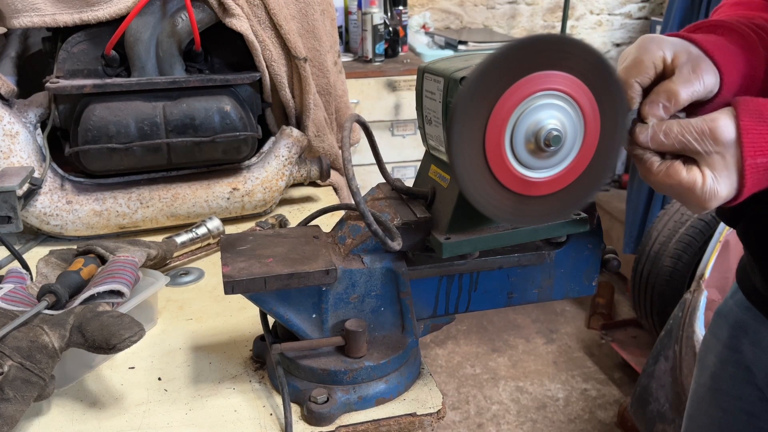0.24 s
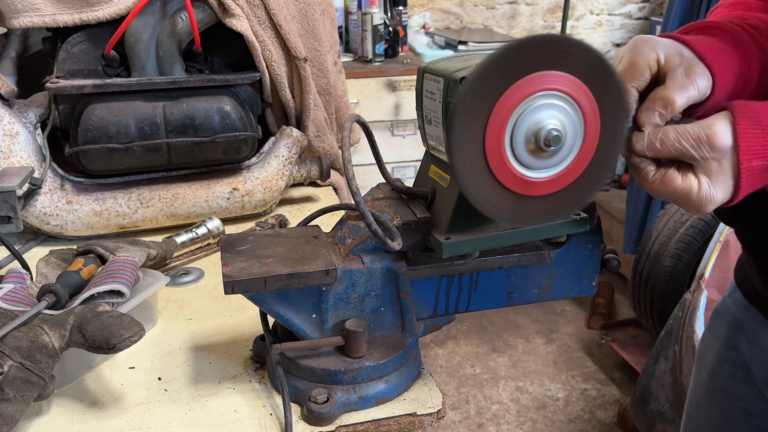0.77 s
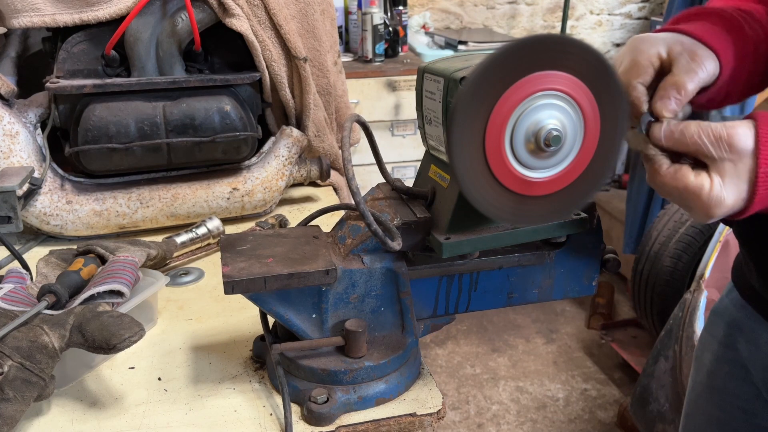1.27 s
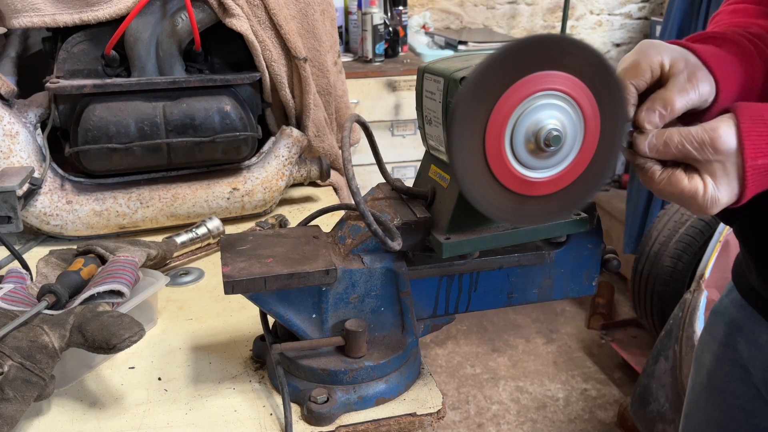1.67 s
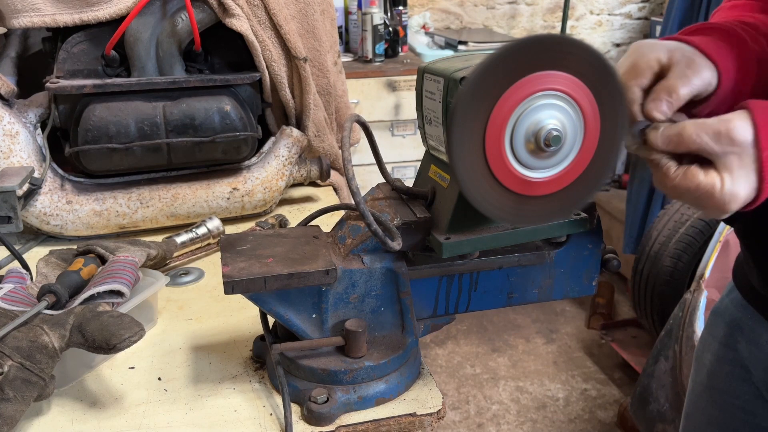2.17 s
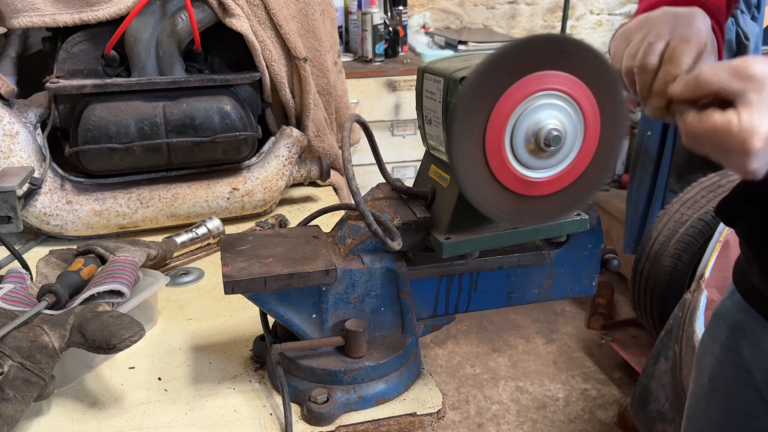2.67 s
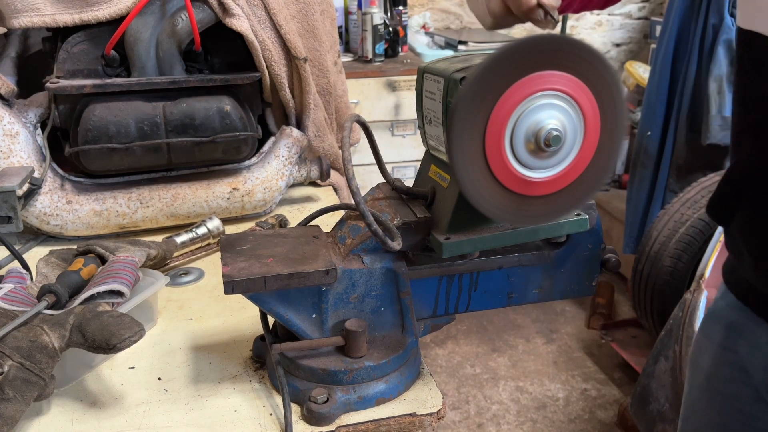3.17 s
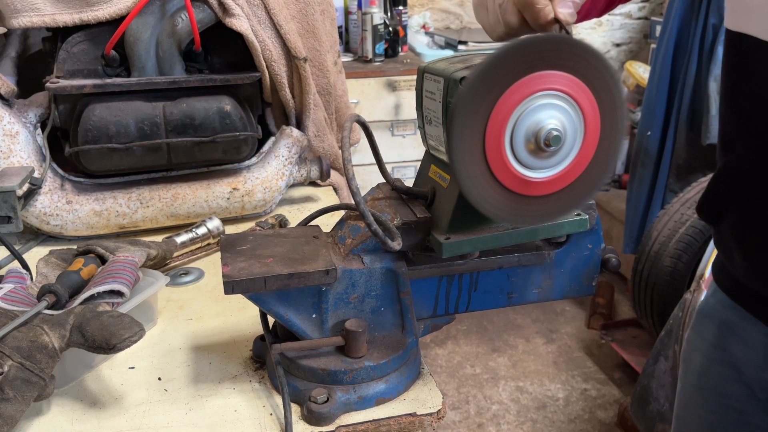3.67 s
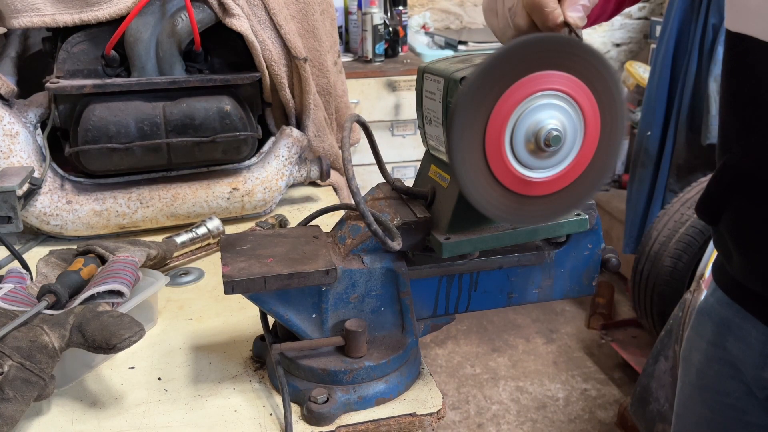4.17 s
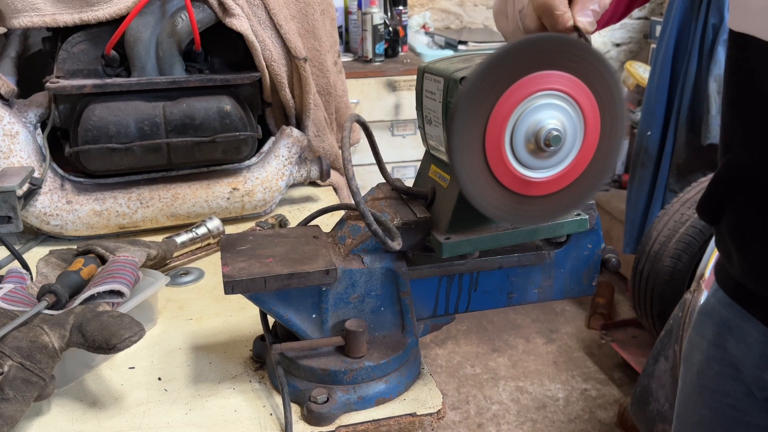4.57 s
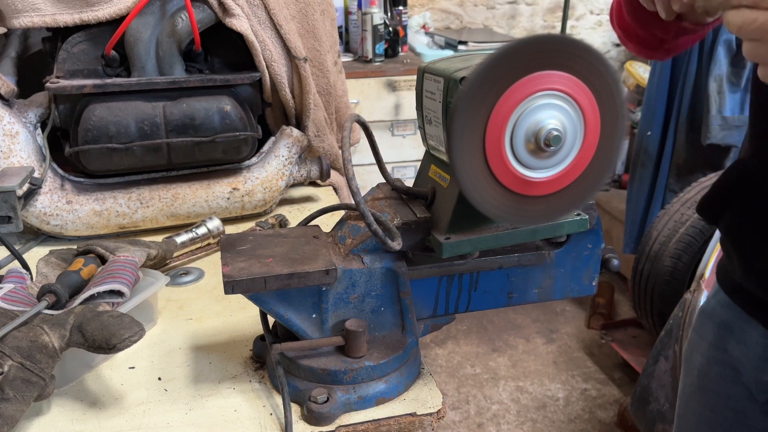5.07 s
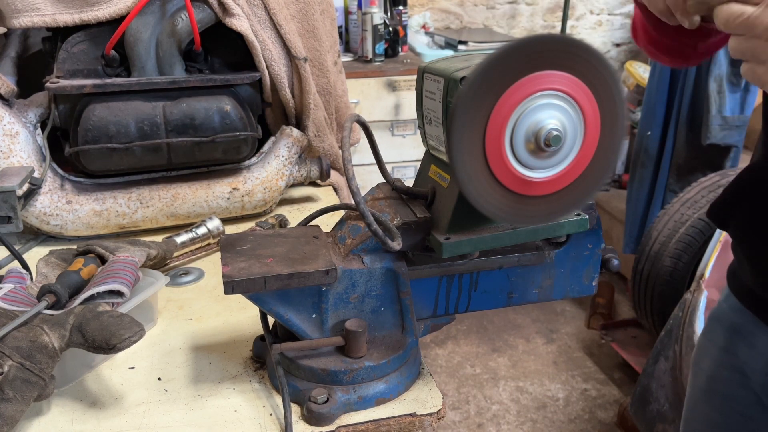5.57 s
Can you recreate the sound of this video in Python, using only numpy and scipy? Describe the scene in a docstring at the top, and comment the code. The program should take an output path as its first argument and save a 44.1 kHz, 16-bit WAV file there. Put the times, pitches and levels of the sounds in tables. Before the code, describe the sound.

Close workshop grinder running throughout, with bursts of harsh metallic scraping on the spinning wheel, pauses of plain motor drone, and a final thinner grind.

```python
"""In a workshop a bench grinder runs at about 49 turns a second. A small steel part is pressed on the front of
its wheel in two goes of two presses each, then once, more lightly, on its top. Rim noise that partly repeats
each turn makes the scrape, and drives resonances that ring like the part. Sine tones tied to the turning make
the bench hum, the motor whine and the bearing tones, which sag under load. Shaped noise makes the air hiss."""
import sys
import numpy as np
from scipy import signal
from scipy.fft import rfft, irfft, next_fast_len
from scipy.io import wavfile
from scipy.ndimage import uniform_filter1d, map_coordinates

SR = 44100
rng = np.random.default_rng(int(sys.argv[2]) if len(sys.argv) > 2 else 0)


def wav_out(sig):
    """Save sig, one row per channel (or a flat mono array), as 16-bit PCM at SR to the path in sys.argv[1]."""
    wavfile.write(sys.argv[1], SR, np.round(np.clip(np.atleast_2d(sig).T, -1, 1) * 32767).astype(np.int16))


N = 257103

# Colour of the scrape on the wheel's front and on its top. Each row: frequency in Hz, relative level in dB per Hz.
FRONT_SCRAPE = [(300, -7.5), (1200, -7.5), (1650, -10), (2700, -10), (3500, -3.5), (4200, 0.3), (4800, -4),
                (5200, -4), (5600, -3), (6200, -4), (8000, -5.5), (11000, -6), (15200, -8.5)]
TOP_SCRAPE = [(300, -16), (1200, -20), (1550, -14), (2600, -14), (3500, -8.5), (4300, -4.5), (5200, -2.5),
              (5600, -3), (6200, -5), (8000, -1.5), (11000, -5.5), (15200, -11)]
# How the main ring's pitch, its level and the knocks' level rise and fall over time.
# Each row: time in seconds, ring frequency in Hz, change of ring level in dB, change of knock level in dB.
RING_CHANGES = [(0.29, 2040, 3, 2.5), (0.45, 2040, 0.5, 2), (0.54, 2050, -2, 4), (0.75, 2030, -0.5, -0.5),
                (0.8, 2020, 3, 4.5), (0.9, 2010, -1, 0), (1.0, 2070, 3, 1), (1.57, 2045, -1, 3),
                (1.64, 2045, 1, -1), (1.73, 2070, 0.5, 2.5), (1.87, 2070, 1, 2.5), (1.97, 2000, 1, 0),
                (2.07, 2090, -2, 0), (3.29, 2070, -2, -6), (3.39, 2030, 0, -1), (3.55, 2080, 1.5, -1.5),
                (3.82, 2130, 4, 1.5), (3.94, 2040, 1, 0.5), (4.05, 2100, 3, -2), (4.35, 2055, 3.5, -3),
                (4.7, 2060, 2, -1)]
# The part's higher ringing notes. Each row: frequency in Hz, width in Hz, level on the front in dB, on the top in dB.
PART_MODES = [(2395, 210, -7.5, -13.5), (3610, 260, -16, -24), (3895, 310, -10, -19), (4194, 130, -11, -15),
              (4430, 160, -8.5, -12), (4630, 190, -19, -10.5), (4900, 110, -17, -21), (5160, 240, -12, -9),
              (5680, 220, -22, -14), (6180, 290, -11, -11)]
# Colour of the bench shaken by the cut. Each row: frequency in Hz, relative level in dB per Hz.
TREMOR = [(100, 1), (230, 2.5), (310, -4), (400, 4.5), (560, -6), (680, -11), (820, 3), (1000, -3),
          (1500, -31), (2500, -45)]
SPOT_BITE_DB = 1.5  # dB of harder cutting per unit of rim height


def grind(turns, force, spectrum, spot_db, mode_db, width_hz, ring_db, knock_db, scrape_db, bump_db, chop_db, shake_db):
    """Grit tears at the steel: a broad scrape, the part's damped ring and a tremor in the bench."""
    # the wheel bites harder once a turn and at each high spot
    once_a_turn_db = bump_db * np.cos(2 * np.pi * turns)
    spots_db = SPOT_BITE_DB * rim_height(turns, spot_db)
    # the hand-held part chatters and single grains crackle
    bite = unit(amp(once_a_turn_db + spots_db + 0.74 * wobble(140)))
    crackle = amp(1.4 * wobble(2500))

    moving_grit = shifting(rim_noise(turns, repeat=0.23), depth_db=2.5)
    scrape = coloured(bite * crackle * moving_grit, spectrum)

    # fine grit keeps a tight ring going; the high spots add short knocks that the fingers damp
    grit = bite * rim_noise(turns, repeat=0.76)
    ring_hz, ring_change_db, knock_change_db = curves(RING_CHANGES)
    knocks = resonant(strikes(turns, spot_db), 1.022 * ring_hz, 1.5 * width_hz)
    # the part rides up and down on the uneven rim, which chops the ring
    ride = rim_height(turns, spot_db) + 0.5 * np.cos(2 * np.pi * turns)
    chop = amp(chop_db * ride + 1.8 * wobble(110))
    steady_ring = resonant(chop * grit, ring_hz, width_hz)
    ring = amp(ring_db + ring_change_db) * steady_ring + amp(knock_db + knock_change_db) * knocks

    upper = 0
    for (hz, width, *_), db in zip(PART_MODES, mode_db):
        upper = upper + amp(db) * resonant(bite * crackle * grit, hz, width)

    tremor = amp(shake_db) * coloured(bite * rim_noise(turns, repeat=0.41), TREMOR)
    return spread(force * (amp(scrape_db) * scrape + upper + ring + tremor))


# Presses on the wheel's front and on its top. Each row: touch in seconds, lift in seconds,
# force in dB compared with a firm press, lean of the hand in dB per second.
FRONT_PRESSES = [(0.236, 0.478, -2.5, -2), (0.485, 0.983, -0.35, 1.5), (1.538, 1.672, -3.0, 16),
                 (1.71, 2.055, 0.47, -4)]
TOP_PRESSES = [(3.262, 4.703, -1.8, 0.03)]
# How the hand bears down during the top press. Each row: time in seconds, change of force in dB.
TOP_HAND = [(3.4, 1), (3.47, -4), (3.6, -2.5), (3.68, -3.5), (3.9, 0.3), (4.0, -1), (4.3, -2), (4.5, -2),
            (4.62, -0.2)]
ATTACK_S, RELEASE_S = 0.05505, 0.06025  # seconds for the part to settle on the wheel and to leave it


def pressing(presses, hand_db=0):
    """Force on the wheel: each press rises, holds while the hand leans in or eases off, and lets go."""
    t = np.arange(N) / SR
    force = np.zeros(N)
    for touch, lift, force_db, lean in presses:
        settle = np.clip((t - touch) / ATTACK_S, 0, 1)
        leave = np.clip(1 - (t - lift) / RELEASE_S, 0, 1)
        lean_db = lean * (np.clip(t, touch, lift) - (touch + lift) / 2)
        force += settle * leave * amp(force_db + hand_db + lean_db)
    return force


# High spots on the rim that strike the part.
# Each row: place in turns, level on the front in dB, level on the top in dB.
HIGH_SPOTS = [(0, 0.5, 0.5), (0.322, -2.5, -6.5), (0.655, -2.5, -6)]
SPOT_WIDTH_TURNS = 0.06  # how much of the rim a high spot takes up


def rim_height(turns, spot_db):
    """Height of the rim under the part: each high spot is a short, rounded hump."""
    away = (turns - np.array(HIGH_SPOTS)[:, :1] + 0.5) % 1 - 0.5
    humps = np.exp(-0.5 * (away / SPOT_WIDTH_TURNS) ** 2)
    return amp(spot_db) @ humps


def strikes(turns, spot_db, scatter_db=1.5, jitter_turns=0.0021, count=300):
    """Every high spot knocks the part once a turn, never twice quite alike."""
    place = np.arange(count)[:, None] + np.array(HIGH_SPOTS)[:, 0]
    place = place + jitter_turns * rng.standard_normal(place.shape)
    # strikes outside the scene land in one spare sample, which is cut off
    sample = np.interp(place, turns, np.arange(N), left=N, right=N).astype(int)
    sizes = amp(spot_db + scatter_db * rng.standard_normal((2, *place.shape)))
    return np.array([np.bincount(sample.ravel(), s.ravel(), N + 1)[:N] for s in sizes])


def rim_noise(turns, repeat, size=1024):
    """Two noises of which a share comes back with every turn, as the same grit passes again."""
    rims = irfft(np.exp(2j * np.pi * rng.random((2, 2, size // 3))), 8 * size)
    place = np.arange(8 * size) / (8 * size)
    inner, outer = [unit(np.array([np.interp(turns, place, r, period=1) for r in rim])) for rim in rims]
    # the track on the rim changes slowly, so each turn is only nearly like the last
    slide = 0.74 * wobble(2.99)
    again = np.cos(slide) * inner + np.sin(slide) * outer
    share = np.clip(repeat, 0, 1)
    return np.sqrt(share) * again + np.sqrt(1 - share) * rng.standard_normal((2, N))


def shifting(x, depth_db, size=1024):
    """Narrow bands of x swell and fade, as the spot in contact keeps moving."""
    bands = signal.stft(x, nperseg=size)[2]
    field = rng.standard_normal(bands.shape[1:])
    field = uniform_filter1d(field, 3, axis=0)  # neighbouring bands move together
    field = uniform_filter1d(field, 10, axis=1)  # and change gradually
    return unit(signal.istft(bands * amp(depth_db * unit(field)), nperseg=size)[1][:, :N])


IDLE_TURNS_PER_S = 48.91
# speed lost under a firm, held press on the front and on the top; how slowly the wheel follows, in seconds
FRONT_SAG_TURNS_PER_S, TOP_SAG_TURNS_PER_S, INERTIA_S = 0.47, 0.29, 0.05


def shaft_speed(front_force, top_force):
    """Turns a second: the load brakes the motor, and the wheel's inertia smooths the sag."""
    sag = FRONT_SAG_TURNS_PER_S * front_force ** 2 + TOP_SAG_TURNS_PER_S * top_force ** 2
    keep = np.exp(-1 / (INERTIA_S * SR))
    return IDLE_TURNS_PER_S - signal.lfilter([1 - keep], [1, -keep], sag)


# Shaking locked to the shaft. Each row: multiple of the turning rate, level in dB within the hum.
SHAFT = [(1, -1), (2, -0.5), (3, -13.5), (4, -26.5), (5, -28.5), (6, -17.5), (7, -19), (8, -32), (9, -25.5),
         (10, -27.5), (11, -27), (12, -32.5), (13, -35), (14, -29.5), (15, -31.5)]


def hum(turns):
    """The unbalanced wheel rocks the bench, whose feet stiffen at the deepest swing; the housing buzzes higher up."""
    # the three lowest multiples keep a fixed timing to one another
    once, twice, thrice = [np.sqrt(2) * amp(db) * np.cos(2 * np.pi * k * turns) for k, db in SHAFT[:3]]
    rocking = thrice - once - twice
    buzz = sum(amp(db) * tone(k * turns, flutter_db=0.29 * k, drift=0.032 * k) for k, db in SHAFT[3:])
    return amp(-31.0 + 0.43 * wobble(13)) * rocking + amp(-31.5) * buzz


# Multiples that a firm press on the front stirs up in the housing.
# Each row: multiple of the turning rate, level in dB.
LOADED = [(5, -53), (8, -55), (9, -51.5), (13, -61), (15, -55), (17, -45), (19, -63), (23, -70)]


def strain(turns, force):
    """The cut loads the shaft unevenly, so some of its multiples swell with the force."""
    return force * sum(amp(db) * tone(k * turns, flutter_db=0.5, drift=0.2) for k, db in LOADED)


# Swells and dips of the whine. Each row: time in seconds, level in dB before a small overall cut.
WHINE_LEVEL = [(0.3, -40), (0.41, -42), (0.6, -34), (0.85, -44), (0.99, -36), (1.08, -40.5), (1.5, -38.5),
               (1.76, -43), (1.91, -36), (2.12, -39), (3.3, -40), (3.47, -37.5), (3.75, -43.5),
               (3.9, -37.5), (4.0, -39.5)]
WHINE_ORDER, MAINS_HZ = 18, 50  # whine cycles per turn; mains frequency
SLIP_BEAT_DB = 1.5  # two of the side tones throb this far up and down as the rotor slips behind the mains


def whine(turns, level_db):
    """The rotor slots sing; the magnetic pull at twice the mains rate and the wheel's wobble add side tones."""
    slots = WHINE_ORDER * turns
    pull = 2 * MAINS_HZ * np.arange(N) / SR
    throb_db = SLIP_BEAT_DB * np.cos(2 * np.pi * 2 * (pull - 2 * turns))
    singing = amp(level_db - 0.5) * tone(slots, flutter_db=0.16, drift=0.05)
    magnetic = amp(-43.5 + throb_db) * tone(slots - pull, flutter_db=1.0, drift=0.12)
    below = amp(-48.5 - throb_db) * tone(slots - turns, flutter_db=1.5, drift=0.19)
    return singing + magnetic + below


# Bearing and magnetic tones between the shaft's multiples.
# Each row: frequency in Hz at the middle (median) speed, level in dB before a tiny overall cut.
BEARINGS = [(166, -61), (215, -60), (264, -48.5), (301, -56), (313, -60), (362, -63), (378, -63),
            (411, -57), (427, -62), (460, -52), (475, -62), (501, -57), (538, -58), (558, -64), (601, -64),
            (802, -57), (821, -52), (1080, -57), (1177, -70)]


def bearings(turns, usual_rate):
    """Rolling tones that follow the shaft's speed and slip a little."""
    tones = sum(amp(db) * tone(hz * turns / usual_rate, flutter_db=1.76, drift=0.39) for hz, db in BEARINGS)
    return amp(-0.07) * tones


# Colour of the air round the wheel and of the rumbling bench. Each row: frequency in Hz, relative level in dB per Hz.
WHEEL_AIR = [(500, -26), (1250, -4), (1650, -4.5), (1950, -5.5), (2600, -7.5), (3050, -6.5), (3600, -3.5),
             (4100, -5.5), (5200, -5), (7500, -1.5), (10800, 0.5), (12500, -4), (15200, -12)]
BENCH = [(20, -18), (70, 2), (180, -3), (280, -7.5), (470, -5), (640, -9.5), (740, -2.5), (820, 0.5),
         (940, -7), (1200, -18), (2000, -26)]
# The bearing's resonances. Each row: frequency in Hz, width in Hz, level in dB within the sizzle.
RACES = [(3190, 116, -3), (3330, 47, -6), (3433, 150, 2)]


def rush(turns):
    """The bench rumbles, the rough wheel drags hissing air round with it and a bearing sizzles and ticks faintly."""
    rumble = amp(-46.0 + 1.1 * wobble(30)) * coloured(rng.standard_normal((2, N)), BENCH)

    swish = amp(0.18 * wobble(4.83) + 0.42 * wobble(30) + 0.4 * np.sin(2 * np.pi * turns))
    hiss = coloured(shifting(rim_noise(turns, repeat=0.11), depth_db=1.5), WHEEL_AIR)
    air = amp(-37.5) * swish * hiss

    ticking = amp(1.9 * np.cos(2 * np.pi * turns) + 2.4 * wobble(300)) * rim_noise(turns, repeat=0.32)
    sizzle = sum(amp(db) * resonant(ticking, hz, width) for hz, width, db in RACES)
    return spread(rumble + air + amp(-54 + 0.66 * wobble(21.84)) * sizzle)


# How alike left and right are. Each row: frequency in Hz, likeness, where 1 is identical and 0 unrelated.
ALIKE = [(120, 0.92), (300, 1), (900, 0.25), (1400, 0.046), (1900, 1), (2600, 0.99), (3300, 0.57),
         (4200, 0.87), (5200, 0.3), (7200, 1), (9500, 1), (12000, 1), (14800, 1)]


def spread(pair):
    """Two unrelated noises become left and right, as alike as the ALIKE table says at each frequency."""
    def shares(hz):
        angle = np.arccos(np.clip(along(ALIKE, hz), -1, 1)) / 2
        return np.array([np.cos(angle), np.sin(angle)])
    mid, side = filtered(pair, shares)
    return np.array([mid + side, mid - side])


# Lead of the left microphone. Each row: frequency in Hz, lead over the right in radians.
LEAD = [(50, 0), (100, 0.11), (400, 0.8), (880, 0.78), (1100, 0.3), (1400, -1.4), (1720, -0.26),
        (2700, -0.5), (3350, 0.9), (3900, 0.1), (4600, 0.2), (4950, 0.7), (5300, -1.5), (6400, -1.5),
        (7300, -1.5), (7700, -2.5), (8800, -4), (9300, -4.5), (10700, -5.5), (11200, -6), (13000, -6),
        (14400, -9.5)]
# Balance of the microphones. Each row: frequency in Hz, left minus right in dB.
TILT = [(200, 0), (370, 0.68), (700, -1.1), (1500, -0.3), (4200, 0.86), (7500, 0.043)]


def microphone_pair(sound):
    """Left and right differ slightly in level and timing, each taking half the difference."""
    sides = np.array([[0.5], [-0.5]])
    return filtered(sound, lambda hz: amp(sides * along(TILT, hz)) * np.exp(1j * sides * along(LEAD, hz)))


def tone(cycles, flutter_db, drift):
    """A sine whose strength is slightly unsteady and whose phase wanders at each microphone."""
    phase = 2 * np.pi * (cycles + rng.random()) + drift * np.array([wobble(7), wobble(7)])
    return np.sqrt(2) * amp(flutter_db * wobble(25)) * np.sin(phase)


def resonant(x, centre_hz, width_hz):
    """x heard through one steep-sided resonance whose centre may move, at rms 1."""
    # shift the centre down to 0 Hz, smooth twice, then shift back up
    carrier = np.exp(2j * np.pi * np.cumsum(centre_hz * np.ones(N)) / SR)
    keep = np.exp(-np.pi * abs(width_hz) / SR)
    smooth = signal.lfilter([1], [1, -2 * keep, keep ** 2], x * carrier.conj())
    return unit((carrier * smooth).real)


def coloured(x, spectrum):
    """x given a spectrum, at rms 1."""
    return unit(filtered(x, lambda hz: amp(along(spectrum, hz))))


def filtered(x, response):
    """x times a complex response of frequency."""
    m = next_fast_len(N + SR // 4)
    return irfft(rfft(x, m) * response(np.fft.rfftfreq(m, 1 / SR)), m)[..., :N]


def wobble(rate):
    """A smooth random curve, rate knots a second."""
    knots = rng.standard_normal(int(N * rate / SR) + 4)
    return map_coordinates(knots, [np.arange(N) * rate / SR])


def curves(rows):
    """One value per sample for each column after the time."""
    s, *cols = np.transpose(rows)
    return [np.interp(np.arange(N) / SR, s, c) for c in cols]


def along(points, hz):
    """(Hz, value) points read on a log axis."""
    f, v = np.transpose(points)
    return np.interp(np.log(hz + 1), np.log(f + 1), v)


def amp(db):
    """Decibels to gain."""
    return 10 ** (np.asarray(db) / 20)


def unit(x):
    """Scaled to rms 1."""
    return x / np.sqrt(np.mean(x ** 2) + 1e-20)


def scene():
    """Everything turns with one shaft; the two microphones hear it slightly out of step."""
    whine_db, = curves(WHINE_LEVEL)
    hand_db, = curves(TOP_HAND)
    front_force = pressing(FRONT_PRESSES)
    top_force = pressing(TOP_PRESSES, hand_db)
    rate = shaft_speed(front_force, top_force)
    turns = np.cumsum(rate) / SR

    *_, front_spots, top_spots = np.transpose(HIGH_SPOTS)
    *_, front_modes, top_modes = np.transpose(PART_MODES)
    front = grind(turns, front_force, FRONT_SCRAPE, front_spots, front_modes, width_hz=188,
                  ring_db=-1.4, knock_db=-3.0, scrape_db=5.5, bump_db=0.5, chop_db=3.5, shake_db=-9.0)
    # held lightly on top, the part is struck mostly by the wheel's highest spot
    top = grind(turns, top_force, TOP_SCRAPE, top_spots, top_modes, width_hz=230,
                ring_db=-5.5, knock_db=-3.5, scrape_db=5, bump_db=1.0, chop_db=1.5, shake_db=-11.0)

    motor = hum(turns) + strain(turns, front_force) + whine(turns, whine_db) + bearings(turns, np.median(rate))
    return microphone_pair(amp(-39) * (front + top) + motor + rush(turns))


TOP_HZ = 15720  # upper band limit


def record(dry):
    """Nothing is kept at or above the band limit."""
    return filtered(dry, lambda hz: hz < TOP_HZ)


dry = scene()
out = record(dry)
wav_out(out)
```